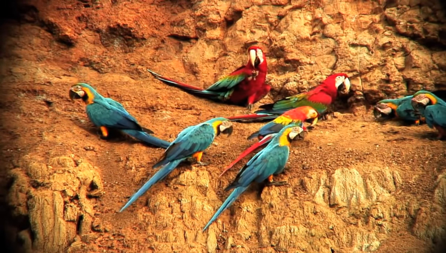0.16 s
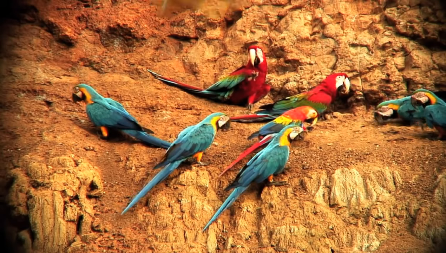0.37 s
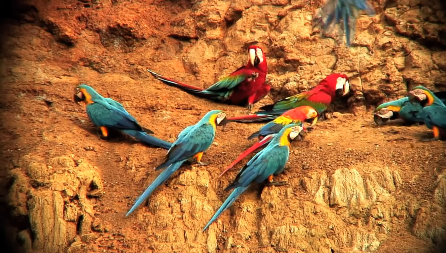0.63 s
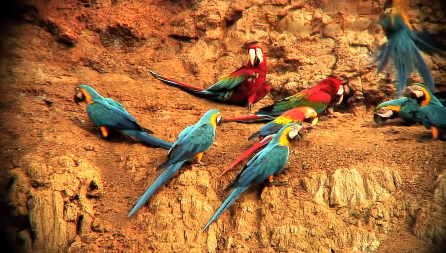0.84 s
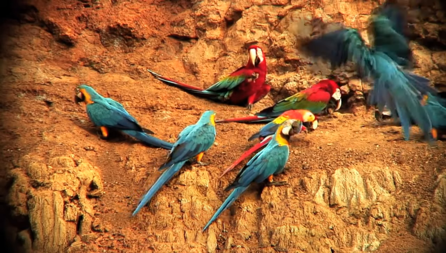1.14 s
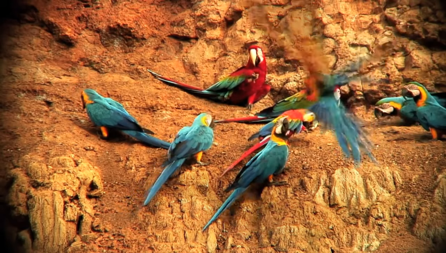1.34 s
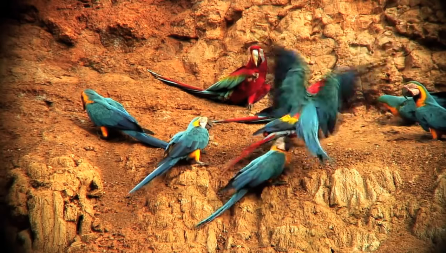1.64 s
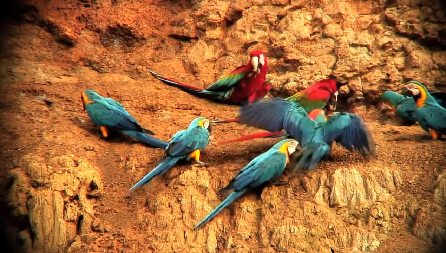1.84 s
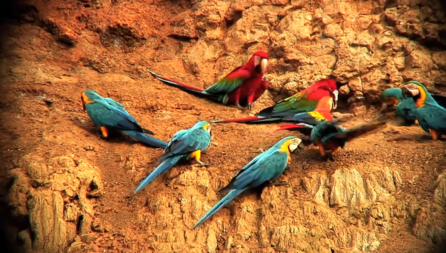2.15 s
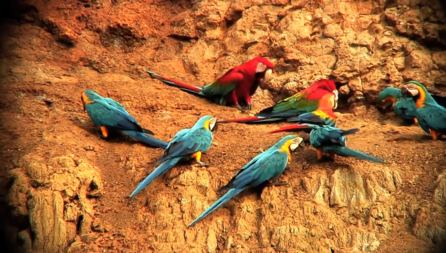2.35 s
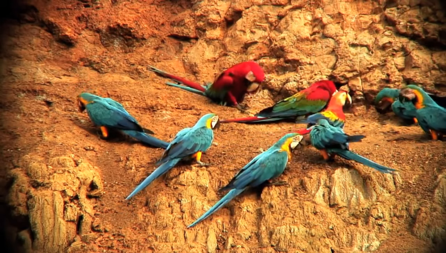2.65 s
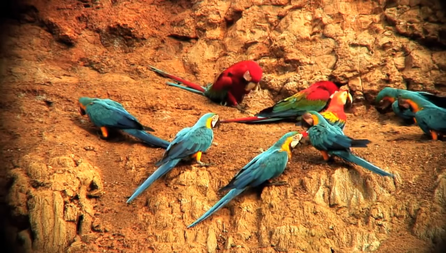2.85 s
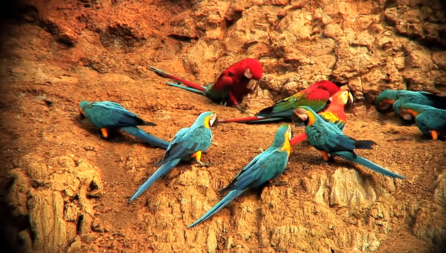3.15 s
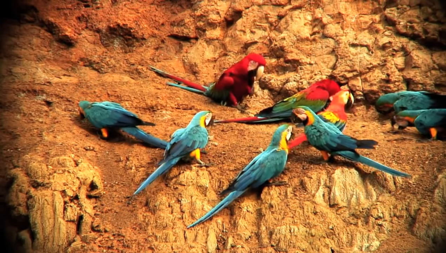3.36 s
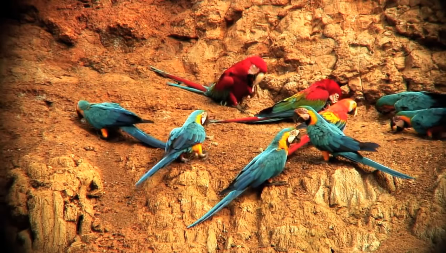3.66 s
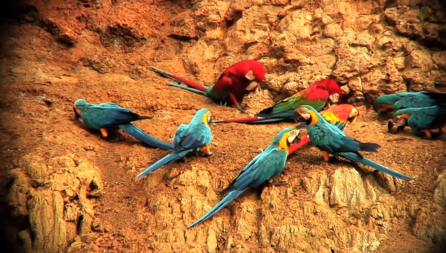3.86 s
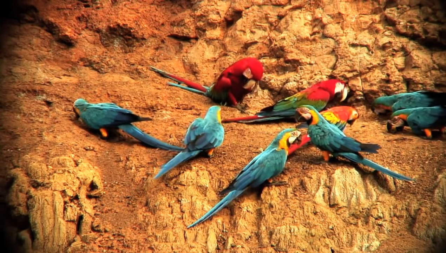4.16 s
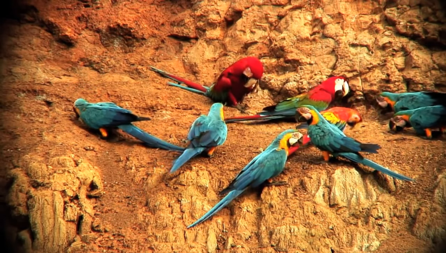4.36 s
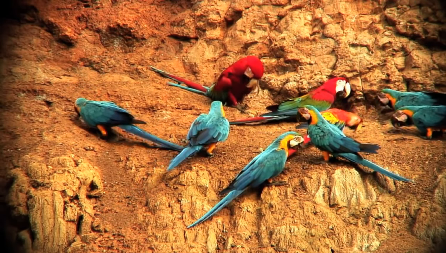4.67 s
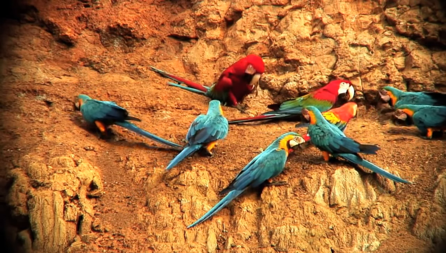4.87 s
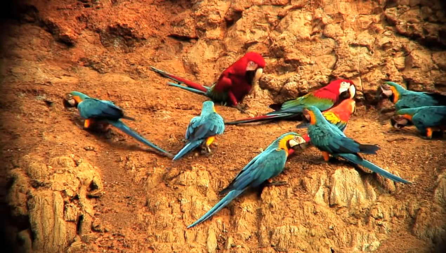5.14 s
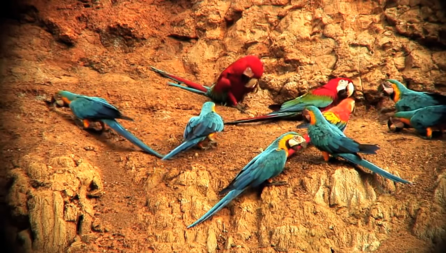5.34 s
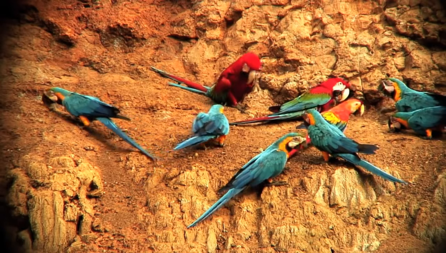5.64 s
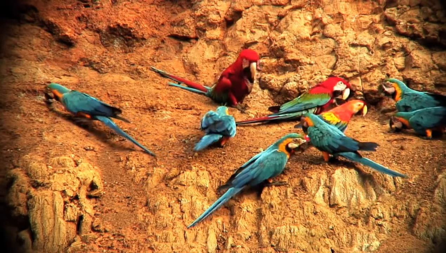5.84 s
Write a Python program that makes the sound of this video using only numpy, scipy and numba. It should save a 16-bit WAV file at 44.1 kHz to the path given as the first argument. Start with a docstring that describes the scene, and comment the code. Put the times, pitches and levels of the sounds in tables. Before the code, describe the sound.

Outdoors at a clay bank, macaws squabble close by while a larger flock chatters behind. Soft wing puffs accompany a low, hoarse stutter, then a flurry of rapid squawks and thin squeals. Calls thin out mid-way, pick up again, and crowd together loudly near the end. A steady, thin insect tone and faint forest air run underneath. Stereo, with light echoes from bank and trees.

```python
"""A large flock of macaws squabbles at a clay bank in the forest, over insects and soft forest air.
A bird flaps in to land over the first second: noise puffs. One low voice stutters near 0.3 s, then quick
squawks follow. Calls thin out after 1.5 s, pick up from 2.7 s and crowd together again near 5.3 s.
Squawks are rough pulses ringing in throat and beak; squeals and yelps are wavering tones.
Behind them many random squawks make a chatter that surges in outbursts; bank and trees add echoes."""
import sys
import numpy as np
from scipy import signal
from scipy.fft import rfft, irfft, next_fast_len
from scipy.io import wavfile
from scipy.ndimage import uniform_filter1d
from numba import njit

SR = 44100
rng = np.random.default_rng(int(sys.argv[2]) if len(sys.argv) > 2 else 0)


def transcribe(signal):
    """Save signal, clipped to [-1, 1], as a 16-bit WAV file at the path in sys.argv[1]."""
    frames = np.atleast_2d(signal).T
    limited = np.clip(frames, -1, 1)
    pcm = np.round(limited * 32767).astype(np.int16)
    wavfile.write(sys.argv[1], SR, pcm)


N = 264732
TIME = np.arange(N) / SR


def from_db(db):
    """Turns decibels into an amplitude factor."""
    return 10 ** (np.asarray(db) / 20)


def rms_one(x):
    """Scales a sound to an average (rms) strength of 1."""
    return x / np.sqrt(np.mean(x ** 2) + 1e-20)


def butter(x, hz, kind, order=2):
    """Keeps the sound below ("low") or above ("high") a frequency."""
    return signal.sosfilt(signal.butter(order, hz, kind, fs=SR, output="sos"), x)


def coloured(x, spectrum):
    """Tints a sound by a curve of (Hz, dB) points, then sets its rms to 1."""
    hz, db = np.transpose(spectrum)
    size = next_fast_len(N)
    bins = np.maximum(np.fft.rfftfreq(size, 1 / SR), 1)
    gain = from_db(np.interp(np.log(bins), np.log(hz), db))
    return rms_one(irfft(rfft(x, size) * gain, size)[..., :N])


def stereo_noise(likeness):
    """White noise that the two channels partly share: likeness 0 is separate, 1 is identical."""
    mid, side = rng.standard_normal((2, N))
    likeness = np.clip(likeness, -1, 1)
    return np.sqrt(1 + likeness) * mid + np.sqrt(1 - likeness) * side * [[1], [-1]]


def wobble(rate_hz):
    """Random wavering up to about a given rate; rms 1."""
    return rms_one(butter(rng.standard_normal(N), rate_hz, "low"))


def add(out, sound, start, pan_db, lag_ms):
    """Places a sound in stereo: positive pan_db favours the left, which hears it lag_ms later."""
    first = max(int(start * SR), 0)
    steps = np.arange(len(sound))
    left = np.interp(steps - lag_ms * SR / 1000, steps, sound)
    pair = np.array([left * from_db(pan_db / 2), sound * from_db(-pan_db / 2)])
    out[:, first:first + len(sound)] += pair[:, :max(N - first, 0)]


def swell(size, edge_s):
    """A call's loudness curve, with rounded start and end."""
    t = np.arange(size) / SR
    to_nearest_end = np.minimum(t, t[::-1])
    return np.sin(np.pi / 2 * np.clip(to_nearest_end / edge_s, 0, 1))


# Tint of the forest air. Columns: pitch_hz, relative_level_db [dB]
AIR_COLOUR = [(20, -13), (60, -8.5), (150, -6.5), (400, -9), (1000, 7.5), (4000, -1), (10000, -43),
              (13000, -24), (15500, -28)]


def forest_air(level_db=-41.5):
    """A steady background of tinted noise, almost unrelated on the two sides."""
    return from_db(level_db) * coloured(stereo_noise(likeness=0.017), AIR_COLOUR)


# Narrow band of the insect chorus. Columns: pitch_hz, relative_level_db [dB]
INSECT_COLOUR = [(5500, -14.5), (6500, -5), (6950, 6), (7300, 8.5), (7600, 3.5), (8000, -14.5), (9500, -29),
                 (11000, -56)]


def insects(level_db=-39, shimmer_db=1.14):
    """A far chorus merges into one thin, high band of noise whose level shimmers."""
    shimmer = from_db(level_db + shimmer_db * wobble(62))
    return shimmer * coloured(stereo_noise(likeness=0.5), INSECT_COLOUR)


# Middle of each wing stroke. Columns: time_s, level_db
WINGBEATS = [(.22, -52.5), (.32, -59), (.42, -56), (0.558, -57), (.67, -53), (.92, -57), (1.1, -59),
             (5.558, -57)]
# Tint of the wing puffs. Columns: pitch_hz, relative_level_db [dB]
WING_COLOUR = [(25, -8), (70, 5), (160, 8.5), (260, 4), (500, -7), (2000, -42)]


def wings(stroke_s=0.076):
    """Each downstroke pushes a soft, low puff of air: noise that swells and fades smoothly."""
    strokes = sum(from_db(db) * np.exp(-((TIME - middle_s) / stroke_s) ** 2) for middle_s, db in WINGBEATS)
    return strokes * coloured(stereo_noise(likeness=0.93), WING_COLOUR)


def forest(x, t60, dull_hz=5000, first_echo_s=0.016):
    """Scattered echoes from bank and trunks, different on each side, fading 60 dB in t60 seconds."""
    t = TIME[:SR]
    echoes = rng.standard_normal((2, SR)) * (rng.random((2, SR)) < .03)  # few arrivals, at random times
    fade = from_db(-60 * t / t60) * np.clip(t / first_echo_s, 0, 1)
    echoes = butter(echoes * fade, dull_hz, "low")
    return signal.fftconvolve(x, echoes / np.sqrt(np.sum(echoes ** 2) / 2), axes=1)[:, :N]


def unrest():
    """What unsettles a syrinx (a bird's voice organ): jitter, pitch wander, loudness flutter, rough air."""
    return np.array([wobble(444), wobble(34.8), wobble(190), rng.standard_normal(N)])


@njit
def resonance(x, turn, r):
    """A hollow that rings at a moving pitch: a two-pole band-pass, applied twice (turn: radians/sample)."""
    y, gain = np.zeros(len(x)), (1 - r * r) / 2
    a1 = a2 = b1 = b2 = feedback = 0.
    for i in range(len(x)):
        if i % 8 == 0:  # retune every 8 samples
            feedback = 2 * r * np.cos(turn[i])
        a = gain * x[i] + feedback * a1 - r * r * a2
        b = gain * (a - a2) + feedback * b1 - r * r * b2
        y[i] = b - b2
        a1, a2, b1, b2 = a, a1, b, b1
    return y


# Resonances of the throat, before each call retunes them; the second is the main one.
# Columns: pitch_hz, width_hz, relative_level_db [dB]
THROAT = [(1110, 1090, -8), (1676, 510, 4)]
# Resonances of the beak, before each call retunes them and opens the beak; the first is the main one.
# Columns: pitch_hz, width_hz, relative_level_db [dB]
BEAK = [(2896, 713, -1), (3887, 1025, -7), (5840, 2200, -13.5), (8460, 2660, -22)]


def squawk(length, first_hz, last_hz, rough, beak_db, beak_hz, throat_hz, chance, arch=.02,
           jitter=0.0812, wander=0.0726, rasp=1.0, flutter_db=4, follow=0.48, mouth_sway=0.024):
    """Uneven syrinx pulses, each with a puff of air, ring in the throat and the open beak."""
    size = int(length * SR)
    shake, sway, flutter, air = chance[:, :size]
    along = np.linspace(0, 1, size)
    rough = np.clip(rough, 0, 1)
    sway = sway - sway.mean()

    # the pitch glides, arches a little, and shakes more in a rough voice
    glide = first_hz + (last_hz - first_hz) * along
    bend = arch * (np.sin(np.pi * along) - .5) + rough * (jitter * shake + wander * sway)
    phase = 2 * np.pi * (np.cumsum(glide * (1 + bend)) / SR % 1) + 1e-9  # never exactly 0: it is divided by

    # equally strong harmonics add up to sharp pulses
    harmonics = int(SR / np.pi / max(first_hz, last_hz))
    pulses = rms_one(np.sin((harmonics + .5) * phase) / np.sin(phase / 2) - 1)
    puffs = rasp * rough * air * (1 + np.cos(phase))
    source = (pulses + puffs) * from_db(flutter_db * rough * np.tanh(flutter))

    # the resonances slide with the pitch, and waver
    mouth = (glide / glide.mean()) ** follow * (1 + mouth_sway * sway)
    throat_scale, beak_scale = throat_hz / THROAT[1][0], beak_hz / BEAK[0][0]
    voice = 0
    for modes, lift_db, scale in ((THROAT, 0, throat_scale), (BEAK, beak_db, beak_scale)):
        for hz, width_hz, db in modes:
            turn = 2 * np.pi * hz * scale * mouth / SR
            ringing = resonance(source, turn, np.exp(-np.pi * width_hz / SR))
            voice = from_db(db + lift_db) * ringing - voice  # signs alternate
    return rms_one(voice) * swell(size, edge_s=.003 + .24 * length)


def outburst(start, length, rise_s=0.044, fall_db_per_s=76):
    """Birds join in quickly, hold on, and drop out one after another: a loudness curve."""
    rise = np.clip((TIME - start) / rise_s, 0, 1)
    return rise * from_db(-fall_db_per_s * np.maximum(TIME - start - length, 0))


def scattered_calls(count, spread_db, lag_spread_ms):
    """Many birds squawk at random, each with its own pitch, rasp, throat, distance and bearing."""
    out, chance = np.zeros((2, N)), unrest()
    for k in range(count):
        when, long, high, fall, harsh, beak, throat, far, side, draw = rng.random(10)
        pitch_hz = 390 * 2.7 ** high
        last_hz = pitch_hz * (1.08 - .33 * fall)
        length, rough = .03 + .1 * long ** 2, .17 + .45 * harsh ** 2
        beak_db, beak_hz, throat_hz = 10 * beak - 8, 2300 + 940 * throat, 1430 + 500 * throat
        call = squawk(length, pitch_hz, last_hz, rough, beak_db, beak_hz, throat_hz,
                      chance[:, int(draw * N / 2):])
        start = (k + when) / count * (TIME[-1] + .1) - .1
        bearing = 2 * side - 1
        add(out, from_db(-9.5 * far) * call, start, spread_db * bearing + 1.4,
            lag_spread_ms * bearing - .035)
    return out


# Tint that distance and foliage give the flock. Columns: pitch_hz, relative_level_db [dB]
FLOCK_COLOUR = [(200, -30), (450, 11), (800, 6.5), (1200, 8.5), (1700, -1), (2250, -7.5), (2900, -1.5),
                (3900, 2.5), (5000, 2), (6500, 0.5), (9500, 1), (12500, 11)]
# Groups in the far flock burst out together; shrillness is treble relative to the outburst's level.
# Columns: start_s, length_s, level_db, shrillness_db
OUTBURSTS = [ (-.05, 0.14, -33.5, 3.5), (0.154, 0.38, -29.5, -3.5), (0.62, 0.17, -35, -25),
             (0.99, 0.13, -40.5, 9), (1.18, 0.34, -38, 1), (1.535, 0.21, -35, -8),
             (1.855, 0.21, -37.5, -26), (2.208, 0.28, -34.5, -3.5), (2.69, 0.4, -32.5, 0),
             (3.46, 0.3, -32, 1.5), (3.81, 0.19, -37.5, 5.5), (4.31, 0.22, -33, -3.5),
             (4.66, 0.48, -36, -0.5), (5.088, 0.14, -29.5, -6), (5.219, 0.19, -37, 8),
             (5.6, 0.35, -36.5, 1.5)]


def flock(count=400, wet_db=-9, chatter_db=-37, chatter_shrill_db=-2.5, split_hz=2184):
    """Distant squawks and their echoes form a chatter, evened out and then raised by outbursts."""
    calls = scattered_calls(count, spread_db=3, lag_spread_ms=0.11)
    calls = coloured(calls + from_db(wet_db) * forest(calls, t60=0.66), FLOCK_COLOUR)

    # outbursts add their power to the chatter; excited birds open their beaks and can turn shrill
    body, treble = from_db(chatter_db), from_db(chatter_db + chatter_shrill_db)
    for start, length, db, shrill_db in OUTBURSTS:
        surge = from_db(db) * outburst(start, length)
        body = np.hypot(body, surge)
        treble = np.hypot(treble, surge * from_db(shrill_db))

    total = 0
    for kind, gain in (("low", body), ("high", treble)):
        part = butter(calls, split_hz, kind, order=4)
        power = uniform_filter1d(np.mean(part ** 2, axis=0), size=6000)  # running average
        total = total + gain * part / np.sqrt(power + 1e-9)
    return total


def off_the_clay(call, paths, share=0.44, longest_s=.003):
    """Quick reflections from the bank behind the bird make its partials uneven; its energy stays."""
    out = np.pad(call, (0, int(longest_s * SR) + 1))
    for lag in (paths * longest_s * SR).astype(int):
        out[lag:lag + len(call)] += share * call
    return out * np.sqrt(np.sum(call ** 2) / np.sum(out ** 2))


# Short low yelps with the beak nearly shut. Columns: start_s, pitch_hz, level_db
YELPS = [(.617, 965, -34), (2.821, 1113, -31.5), (4.073, 1110, -33.5)]
# Thin squeals. Columns: start_s, length_s, first_hz, last_hz, level_db
SQUEALS = [ (0.645, 0.034, 3000, 3040, -26.5), (.704, 0.018, 3780, 3820, -22),
           (0.74, 0.024, 3930, 3890, -23.5), (0.772, 0.013, 3650, 3520, -26),
           (.78, 0.015, 3326, 3144, -26.5), (.956, 0.01, 2780, 2920, -28.5),
           (1.053, 0.016, 2980, 2740, -33), (1.123, 0.024, 4000, 3980, -33.5),
           (1.284, 0.03, 3280, 3240, -29), (1.289, 0.014, 6600, 6120, -30), (2.305, 0.056, 3980, 4260, -40),
           (2.566, 0.05, 2540, 3020, -32), (2.628, 0.062, 3480, 3450, -29.5),
           (2.675, 0.03, 2835, 2730, -27.5), (3.369, 0.02, 3113, 3000, -28.5),
           (3.568, 0.023, 3270, 3250, -28), (3.758, 0.046, 5450, 6400, -39.5),
           (3.89, 0.033, 3750, 3620, -26), (4.093, 0.031, 2850, 2810, -36.5),
           (4.115, 0.023, 4850, 5550, -37.5), (4.19, 0.022, 4000, 2990, -33.5),
           (4.21, .03, 2750, 2780, -37), (4.255, 0.031, 4900, 5700, -40), (4.331, 0.014, 3920, 3380, -33),
           (5.287, 0.029, 2875, 2950, -24), (5.366, 0.025, 3720, 3740, -25),
           (5.574, 0.059, 4020, 4020, -35.5), (5.749, 0.039, 3045, 3070, -34)]


def tonal_calls(yelp_s=0.026, yelp_fall=0.056):
    """Lists squeals and yelps; each yelp's pitch falls by a set share: start, length, first Hz, last Hz, dB."""
    yelps = [(start, yelp_s, hz * (1 + yelp_fall / 2), hz * (1 - yelp_fall / 2), db)
             for start, hz, db in YELPS]
    return SQUEALS + yelps


def near_squeals(chance, lag_ms, jitter=0.018, wander=0.0061, flutter_db=4, second_db=-17,
                 third_db=-17, slip_rough=4.2):
    """Squeals and yelps: a wavering tone with two weak overtones slips from one pitch to another."""
    out = np.zeros((2, N))
    for start, length, first_hz, last_hz, db in tonal_calls():
        size = int(length * SR)
        shake, sway, flutter, _ = chance[:, int(start * SR):][:, :size]
        slip = (1 - np.cos(np.linspace(0, np.pi, size))) / 2  # holds, slips, and holds again
        glide = first_hz + (last_hz - first_hz) * slip
        slip_jitter = jitter * (1 + slip_rough * abs(np.log(last_hz / first_hz)))  # wide slips turn rough
        phase = 2 * np.pi * np.cumsum(glide * (1 + slip_jitter * shake + wander * sway)) / SR
        tone = np.sin(phase) + from_db(second_db) * np.sin(2 * phase) + from_db(third_db) * np.sin(3 * phase)
        tone = butter(tone, 10400, "low") * from_db(flutter_db * np.tanh(flutter))
        add(out, from_db(db) * rms_one(tone) * swell(size, edge_s=.003), start, 0, lag_ms)
    return out


def tuned_throat(pitch_hz, rest_hz=1755, tuning=0.4, strong_hz=1600):
    """The throat moves a share of the way from rest to the voice's harmonic nearest strong_hz."""
    harmonic_hz = pitch_hz * max(round(strong_hz / pitch_hz), 1)
    return rest_hz + tuning * (harmonic_hz - rest_hz)


# One bird stutters on a single low note.
# Columns: start_s, length_s, level_db, beak_opening_db, beak_resonance_hz, throat_resonance_hz
STUTTER = [(0.273, 0.022, -19.5, -19, 2780, 1830), (0.315, 0.022, -19, -9, 2730, 1850),
           (0.357, 0.0223, -19.5, -10, 2650, 1760), (0.387, 0.039, -18.5, -6, 2480, 1760)]
# Near squawks; the fall is the share by which the pitch drops. Columns: start_s, length_s, pitch_hz,
# pitch_fall [share], level_db, roughness [0-1], beak_opening_db, beak_resonance_hz
SQUAWKS = [ (0.0, 0.079, 458.3, 0.045, -25.5, 0.03, 2, 2550),
           (0.188, 0.074, 937, 0.063, -26, 0.71, 5, 2740), (0.634, 0.027, 1567, -0.047, -26, 0.47, 9, 2980),
           (0.668, 0.035, 817, 0.072, -21.5, 0.92, 5.5, 3020),
           (0.721, 0.016, 1740, 0.21, -19, 0.56, 6.5, 3130),
           (0.734, 0.037, 786, 0.022, -22, 0.35, -2, 3000),
           (0.766, 0.0069, 1723, 0.15, -20, 0.56, 4.5, 2930),
           (0.773, 0.0315, 798, 0.059, -24.5, 0.85, 0.5, 2970),
           (0.967, 0.039, 1767, 0.036, -28.5, 0.24, 8.5, 3050),
           (1.016, 0.026, 1780, 0.21, -28, 0.25, 6, 3100),
           (1.076, 0.055, 775, 0.053, -32.5, 0.42, -9, 2940),
           (1.118, 0.12, 661, 0.058, -29.5, 0.05, -23, 2900),
           (1.226, 0.084, 845.3, 0.12, -26.5, 0.17, 3, 3500),
           (1.316, 0.018, 772, 0.082, -27, 0.13, -11, 3200),
           (1.323, 0.055, 722, 0.05, -27.5, 0.01, 21, 3400),
           (1.372, 0.047, 664, 0.29, -30, 0.05, -26, 2800),
           (1.462, 0.15, 721, 0.036, -34.5, 0.17, -7, 2850),
           (1.954, 0.066, 839, -0.16, -29.5, 0.35, -25, 2900),
           (2.042, 0.043, 772, 0.29, -30, 0.52, -5, 2980), (2.713, 0.11, 493, 0.029, -30, 0.16, -6.5, 2940),
           (2.838, 0.11, 783, 0.058, -26, 0.39, -8.5, 3500),
           (2.95, 0.17, 812.5, -0.05, -26.5, 0.53, -10, 2780),
           (3.338, 0.034, 840, -0.035, -25.5, 0.55, 3.5, 2960),
           (3.376, 0.029, 1495, 0.057, -24, 0.66, 8, 3120), (3.406, 0.023, 839, 0.19, -24.5, 0.57, 0, 2950),
           (3.429, 0.031, 822, 0.068, -27.5, 0.48, 0, 3060),
           (3.454, 0.051, 336, 0.076, -31, 0.17, 17, 3200),
           (3.519, 0.057, 799, -0.043, -29.5, 0.42, -21, 2900),
           (3.613, 0.06, 490, 0.03, -27, 0.22, 2.5, 3230), (3.664, 0.04, 860, 0.18, -25, 0.54, -1, 3000),
           (3.796, 0.07, 352, 0.0059, -27, 0.49, -9.5, 2780),
           (3.903, 0.012, 935, 0.012, -27.5, .91, 0, 2850), (3.938, 0.082, 744, 0.1, -27, 0.17, 6, 3440),
           (4.401, 0.1, 822, 0.084, -30, 0.62, 8, 2930), (4.757, 0.047, 770, 0.0095, -28, 0.09, -4.5, 2900),
           (4.827, 0.043, 533.5, 0.1, -25.5, 0.21, -4, 2930),
           (4.874, 0.036, 809, .005, -24, 0.1, -5.5, 3100),
           (4.943, 0.084, 852, 0.0094, -29.5, 0.25, -2, 2600),
           (5.027, .058, 831, 0.073, -26.5, 0.64, -5.5, 2600),
           (5.132, 0.2, 409.6, 0.029, -27.5, 0.33, -8, 2730),
           (5.275, 0.031, 659, -0.0003, -26.5, 0.85, 4, 3100),
           (5.315, 0.0284, 909, -0.03, -18.5, 0.74, 8.5, 3080),
           (5.343, 0.023, 831, 0.1, -20.5, 0.7, 4.5, 3050),
           (5.385, 0.0113, 1764, 0.355, -18.5, 0.57, 8, 3130),
           (5.396, 0.03, 770, 0.0019, -26, 0.3, 11, 3000), (5.43, 0.015, 1797, 0.29, -23.5, 0.6, 6, 3070),
           (5.448, 0.028, 849, 0.1, -29, 0.62, 3, 2980), (5.749, 0.12, 783, 0.021, -29.5, 0.36, -2.5, 2980)]


def near_calls(stutter_hz=410.3, stutter_fall=0.047, stutter_rough=0.29):
    """Lists squawks and stuttered syllables: the squawk columns, then the throat resonance in Hz."""
    calls = [(start, length, pitch_hz, *rest, tuned_throat(pitch_hz))
             for start, length, pitch_hz, *rest in SQUAWKS]
    stutter = [(start, length, stutter_hz, stutter_fall, db, stutter_rough, *mouth)
               for start, length, db, *mouth in STUTTER]
    return calls + stutter


# Where the loudest birds sit. Columns: time_s, left_minus_right_db
BEARING = [(0, 2.5), (.42, 3.5), (.62, -1.5), (.8, -1), (1.0, 3.5), (1.5, 1.5), (2.0, -6), (2.8, 0),
           (3.6, 0.5), (4.4, 5.5), (4.8, -1.5), (5.8, 3.5)]


def near_squawks(chance, lag_ms, overhang_s=.007, lag_spread_ms=0.089):
    """Rough voices on the bank, each coloured by quick reflections off the clay."""
    out = np.zeros((2, N))
    for start, length, pitch_hz, fall, db, rough, beak_db, beak_hz, throat_hz in near_calls():
        draw, seat, *paths = rng.random(4)
        first_hz, last_hz = pitch_hz * (1 + fall / 2), pitch_hz * (1 - fall / 2)
        # a little longer than listed, to make room for the rounded ends
        call = squawk(length + overhang_s, first_hz, last_hz, rough, beak_db, beak_hz, throat_hz,
                      chance[:, int(draw * N / 2):])
        call = from_db(db) * off_the_clay(call, np.array(paths))
        pan_db = np.interp(start, *np.transpose(BEARING))
        add(out, call, start - overhang_s / 2, pan_db, lag_ms + lag_spread_ms * (2 * seat - 1))
    return out


def near_birds(lag_ms=-0.021):
    """The birds on the bank squawk, or squeal and yelp, all drawing on the same random unrest."""
    chance = unrest()
    return near_squawks(chance, lag_ms) + near_squeals(chance, lag_ms)


def scene():
    """Near calls and their echoes over the flock, the wings, the insects and the forest air."""
    background = forest_air() + insects() + wings() + flock()
    near = butter(near_birds(), 9650, "low", order=4)  # air absorbs the highest treble
    return background + near + from_db(-12.0) * forest(near, t60=0.31)


# How wide each band sounds. Columns: pitch_hz, side_gain_db
STEREO_WIDTH = [(200, 2.5), (700, 0.5), (1750, -3.5), (2800, 0), (4200, 3.5), (6400, -8), (9800, -7.5),
                (13000, 1.5)]


def record(dry, cutoff_hz=15600):
    """Some bands sound wider than others, and the treble above about 6 kHz sits narrower; the top is cut
    steeply."""
    mid, side = (dry[0] + dry[1]) / 2, (dry[0] - dry[1]) / 2
    hz, db = np.transpose(STEREO_WIDTH)
    size = next_fast_len(N)
    width = from_db(np.interp(np.fft.rfftfreq(size, 1 / SR), hz, db))
    side = irfft(rfft(side, size) * width, size)[:N]
    steep_cut = signal.ellip(10, .1, 90, cutoff_hz, fs=SR, output="sos")
    return signal.sosfilt(steep_cut, [mid + side, mid - side])


dry = scene()
out = record(dry)
transcribe(out)
```